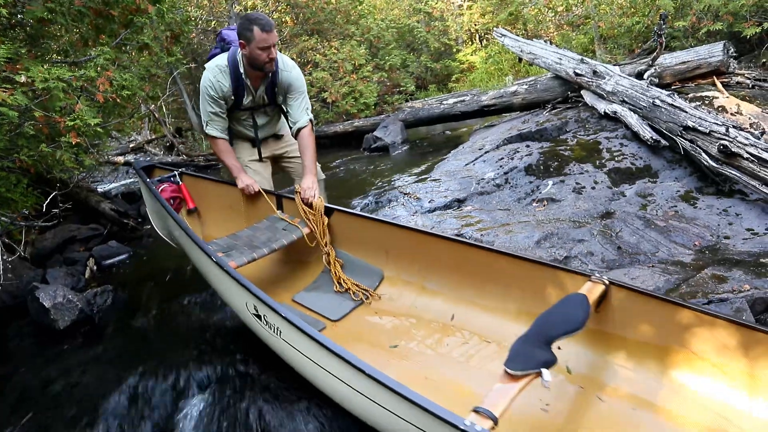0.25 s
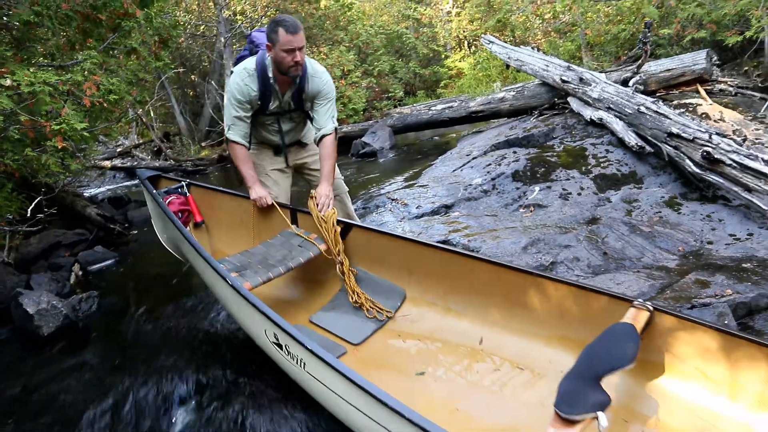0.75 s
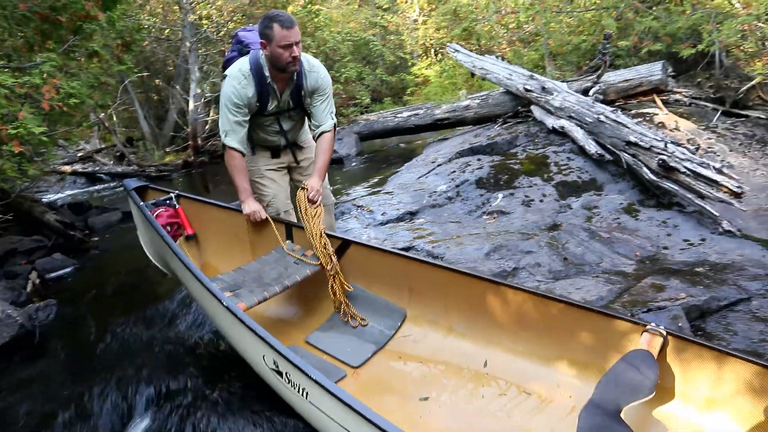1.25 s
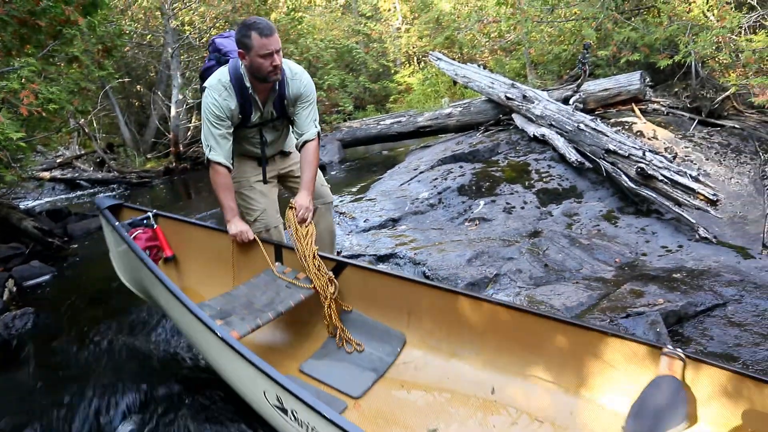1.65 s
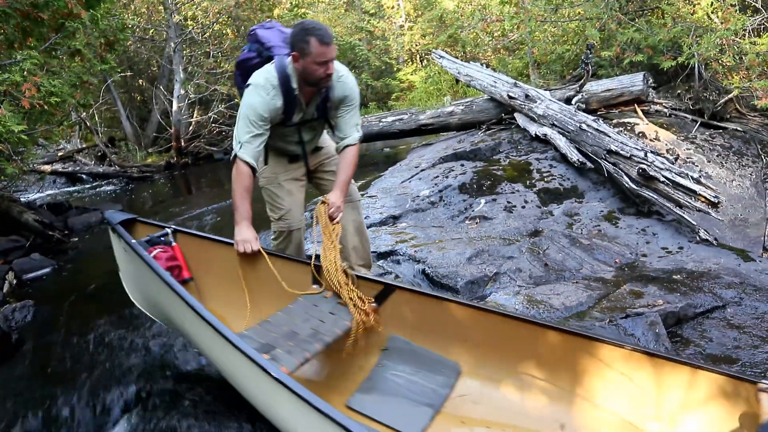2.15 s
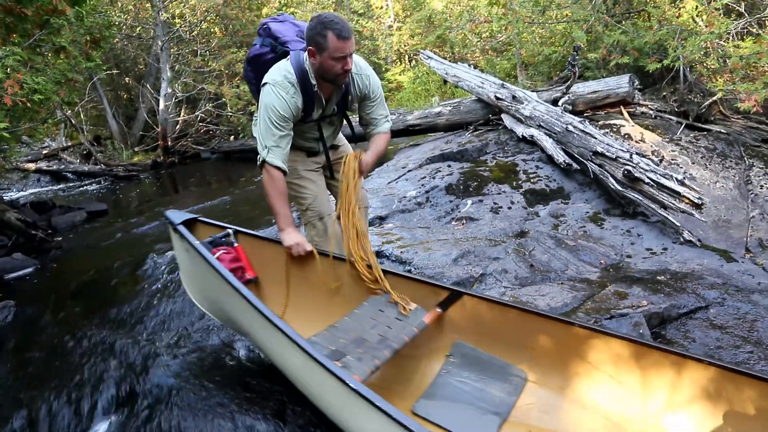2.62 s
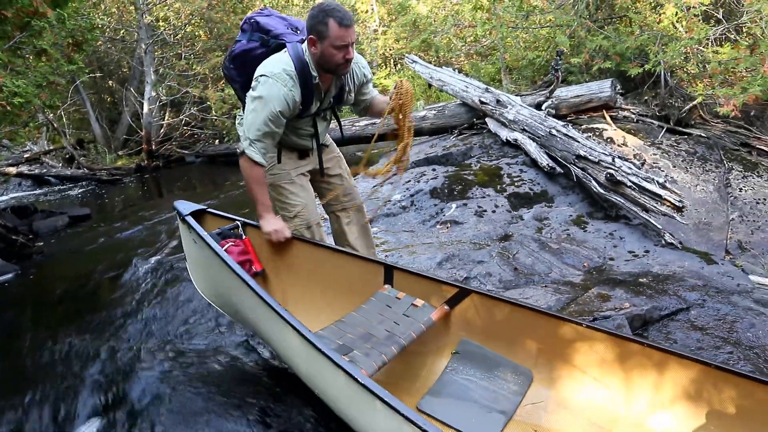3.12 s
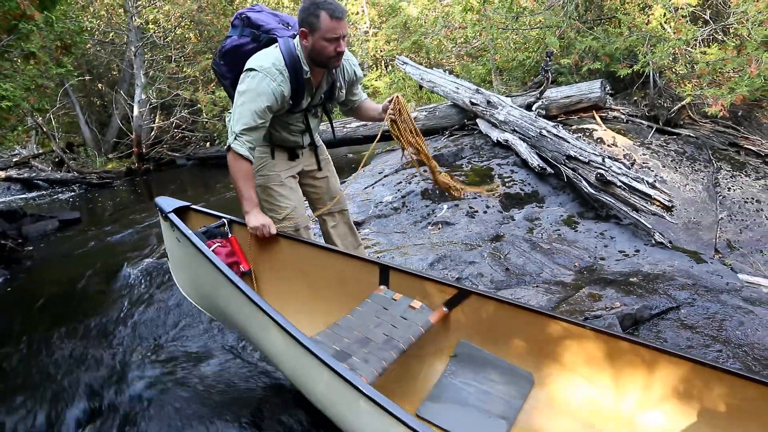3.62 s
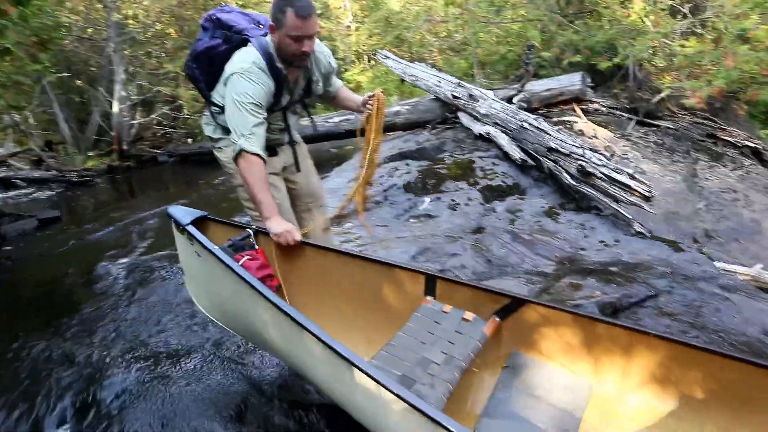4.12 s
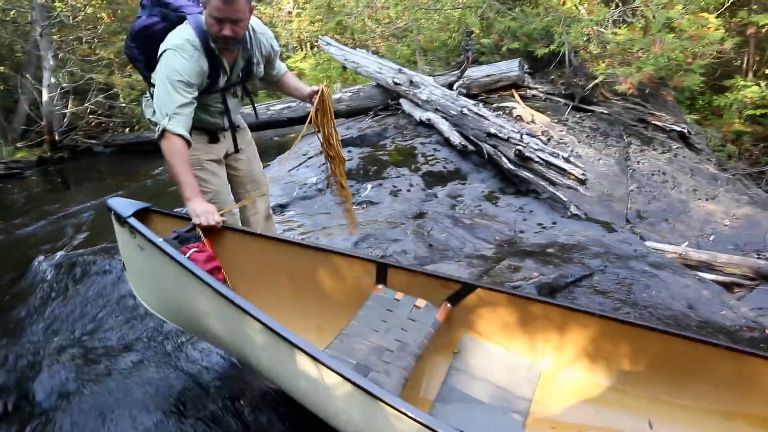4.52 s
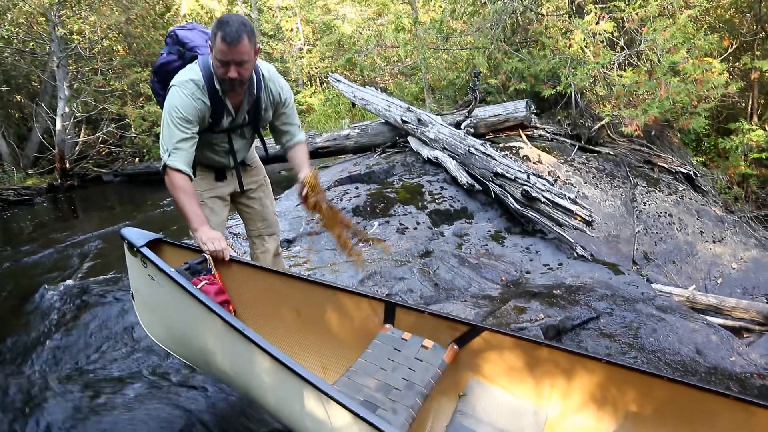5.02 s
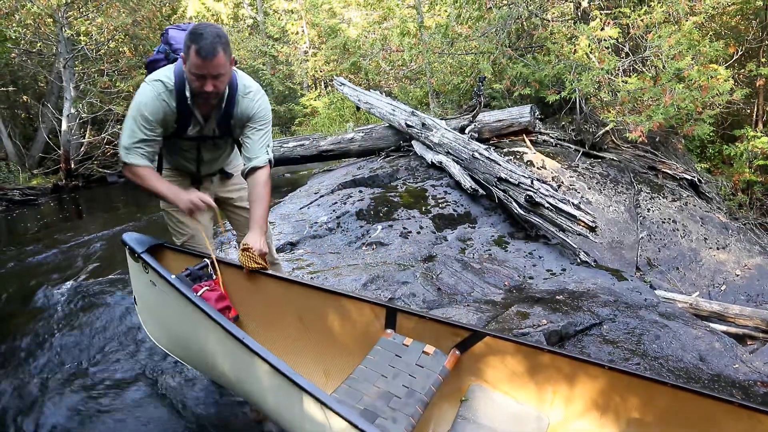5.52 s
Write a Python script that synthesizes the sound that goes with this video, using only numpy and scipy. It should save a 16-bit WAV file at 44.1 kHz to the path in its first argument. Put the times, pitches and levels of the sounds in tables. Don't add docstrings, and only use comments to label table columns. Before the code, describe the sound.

A broad waterfall rush runs from start to finish, barely swelling and sinking, with gurgling bubbles and faint bright drop ticks on top. Against it, a thin canoe hull lands on rock now and then: muffled thumps, hollow panel knocks and soft low booms of pushed water. The strongest triple bump comes near the end. It is heard close up in wide stereo, in open air, the level dipping slightly after the hardest hits.

```python
import sys
import numpy as np
from scipy import signal
from scipy.io import wavfile

SR = 44100
rng = np.random.default_rng(int(sys.argv[2]) if len(sys.argv) > 2 else 0)


def master_out(mix):
    frames = np.transpose(np.atleast_2d(mix))
    ceiling = np.clip(frames, -1, 1)
    pcm = np.round(ceiling * 32767).astype(np.int16)
    wavfile.write(sys.argv[1], SR, pcm)


def decibels_to_gain(level_db):
    exponent = np.asarray(level_db, float) / 20
    return 10 ** exponent


N = 253575


def rms_one(x):
    return x / np.sqrt(np.mean(x ** 2) + 1e-20)


def at_hz(points, hz):
    at, *columns = np.transpose(points)
    return [np.interp(np.log(hz), np.log(at), c) for c in columns]


def filtered(x, order, hz, kind):
    return signal.sosfilt(signal.butter(order, hz, kind, fs=SR, output="sos"), x)


def filtered_both_ways(x, order, hz, kind):
    return signal.sosfiltfilt(signal.butter(order, hz, kind, fs=SR, output="sos"), x)


def add(out, s, sound):
    start = round(s * SR)
    out[start:start + len(sound)] += sound[:N - start]


def drift(rate):
    r = np.exp(-80 * np.pi * rate / SR)
    noise = rng.standard_normal(N // 40 + 2002)
    slow = signal.lfilter([1], [1, -2 * r, r * r], noise)[2000:]
    return np.interp(np.arange(N) / 40, np.arange(len(slow)), rms_one(slow))


def ring(clicks, hz, t60):
    r, w = decibels_to_gain(-60 / (t60 * SR)), 2 * np.pi * hz / SR
    return signal.lfilter([0, np.sin(w)], [1, -2 * r * np.cos(w), r * r], clicks + 1e-18)


def grains(per_s, size_db, clump_db, pitches):
    sizes = decibels_to_gain(size_db * np.minimum(rng.exponential(1, N), 4)) * rng.choice([-1, 1], N)
    born = rng.random(N) < per_s * decibels_to_gain(clump_db * drift(7.0)) / SR
    dealt = rng.integers(0, len(pitches), N)
    return [(hz, sizes * born * (dealt == k)) for k, hz in enumerate(pitches)]


def swell_db(hz):
    # start_s, level_db
    flow = [(0, -21.5), (.7, -20.5), (1.2, -21), (1.95, -20.5), (2.3, -21), (3.0, -20.5), (3.3, -21.5),
            (3.6, -19.5), (4.0, -21), (4.7, -20.5), (5.0, -22), (5.3, -20), (5.75, -20.5)]
    # centre_hz, mean_db, share of flow swing [ratio]
    layers = [
        (70, -4.5, 0.15),
        (274, -1, 0.65),
        (990, 2, 1.4),
        (2320, 0.0, 0.54),
    ]
    s, flow_db = np.transpose(flow)
    mean_db, share = at_hz(layers, hz)
    return mean_db + share * np.interp(np.arange(N) / SR, s, flow_db - flow_db.mean())


def ports(common, other, hz):
    # freq_hz, level_db against common
    port_difference = [(110, -61), (210, -21), (330, -27), (500, -16.5), (760, -8.5), (1170, -10),
                       (1780, 0), (2730, 0.5), (4170, 5.5), (6500, 3.5), (8200, -7), (10100, 7),
                       (12500, 15.5), (15000, 24)]
    # freq_hz, difference in step [share], quarter cycle ahead [share]
    lean = [(150, -0.2, 0.0), (330, 0.23, .1), (550, -0.22, -0.13), (900, -0.43, .05), (1300, -0.36, -0.46),
            (1900, -0.44, -0.18), (2800, -0.31, -0.076), (4500, -0.36, -.05), (7000, 0.084, 0.0)]
    in_step, late = np.clip(at_hz(lean, hz), -.65, .65)
    quarter = np.gradient(common) / np.sin(2 * np.pi * hz / SR)
    free = np.sqrt(1 - in_step ** 2 - late ** 2)
    side = decibels_to_gain(at_hz(port_difference, hz)[0]) * (in_step * common + late * quarter + free * other)
    return np.array([common + side, common - side])


def roar(surge_db, patchy_db):
    # freq_hz, density_db per Hz
    spectrum = [(45, -10), (80, -21), (125, -4.5), (200, 0.5), (320, 2), (520, -6.5), (800, -6.5),
                (1150, -4.5), (1550, -9), (1750, -10.5), (2600, -13.5), (4200, -21), (6500, -26),
                (8200, -20.5), (15000, -74)]
    level_db, facing_db, turn_db_per_s = -17, 0.43, -0.3053
    edges_hz = 22 * 2 ** (np.arange(30) / 3)
    white = rng.standard_normal((2, 2, N + 4000))
    surge = drift(23.0)
    facing = decibels_to_gain(facing_db + turn_db_per_s * np.arange(N) / SR)
    mid, out = 0, 0
    for k, (low_hz, high_hz) in enumerate(zip(edges_hz, edges_hz[1:])):
        hz = np.sqrt(low_hz * high_hz)
        band = filtered(white[k % 2], 2, [low_hz, high_hz], "band")[:, 4000:]
        flicker_db = patchy_db * min(1, 1600 / hz) * drift(26.0)
        band = band * decibels_to_gain(at_hz(spectrum, hz)[0] + swell_db(hz) + surge_db * surge + flicker_db)
        turned = (facing - 1) * band[0] * (hz > 2000)
        mid = mid + band[0]
        out = out + ports(band[0], band[1], hz) + turned
    return decibels_to_gain(level_db) * out / np.std(mid)


def bubbles():
    level_db, ring_cycles = -22.5, 8.2
    out = 0
    for hz, clicks in grains(per_s=700, size_db=3.5, clump_db=2.5, pitches=np.geomspace(170, 1800, 16)):
        pocket = ring(clicks, hz, ring_cycles / hz) * decibels_to_gain(swell_db(hz))
        out = out + ports(pocket, np.roll(pocket, N // 3), hz)
    return decibels_to_gain(level_db) * rms_one(out)


def puffs_db():
    # centre_s, rise_db
    puffs = [(0.05, 10), (.48, 11), (1.0, 8), (1.3, 6), (1.5, 10), (1.75, 9), (2.3, 5), (2.5, 8), (3.02, 7),
             (3.55, 6.5), (3.85, 7), (4.05, 3), (4.55, 4), (4.75, 4), (5.22, 8), (5.65, 5)]
    width_s = .08
    t = np.arange(N) / SR
    return sum(rise_db * np.exp(-((t - s) / width_s) ** 2) for s, rise_db in puffs)


def mist():
    # freq_hz, level_db
    drop_colour = [(7000, -7), (8300, -4), (10500, -2), (12000, -3.5), (13500, -3), (15000, -3)]
    # start_s, tilt_db_per_octave
    spray_tilt = [(0, -6), (1.5, -7), (2.3, -4), (2.6, -3), (3.0, -5), (3.4, -3), (3.6, 1), (4.1, 4),
                  (4.3, .3), (4.6, 2), (5.1, -4), (5.4, 0), (5.75, 0)]
    level_db, puff_share, ring_cycles = -55.0, .55, 220.0
    tilt_db = np.interp(np.arange(N) / SR, *np.transpose(spray_tilt))
    ticks = 0
    for hz, clicks in grains(per_s=450, size_db=1.7, clump_db=.3, pitches=np.geomspace(7700, 14900, 34)):
        colour_db = at_hz(drop_colour, hz)[0] + tilt_db * np.log2(hz / 10000)
        ticks = ticks + ring(decibels_to_gain(colour_db) * clicks, hz, ring_cycles / hz)
    ticks = filtered(ticks, 4, 6500, "high")
    return decibels_to_gain(level_db + puff_share * puffs_db()) * rms_one(ticks)


def plops():
    # start_s, peak_db, pitch_hz
    single = [(.219, -7.5, 1570), (.334, -5.5, 1560), (.879, -12.5, 964), (.942, -19, 1040),
              (1.174, -15, 1080), (1.436, -13, 680), (1.718, -20, 1020), (2.074, -9, 834),
              (2.263, -17, 1780), (2.344, -17, 636), (2.59, -12, 1005), (2.714, -14.5, 648),
              (2.732, -12, 2000), (2.864, -9, 1660), (3.096, -23, 540), (3.226, -15, 1170),
              (3.301, -14, 1630), (3.385, -10, 1550), (3.673, -9, 1660), (3.819, -13, 655),
              (4.013, -13, 1020), (4.135, -14, 1210), (4.314, -16, 1680), (4.374, -12.5, 820),
              (4.436, -14, 840), (4.615, -10, 956), (4.668, -13, 1100), (4.77, -18, 755), (4.934, -13, 875),
              (5.046, -8.5, 1040), (5.227, -10, 1137), (5.265, -9, 1170), (5.408, -10, 1030),
              (5.499, -7, 1000), (5.609, -16, 2000)]
    # start_s, peak_db, pitch_hz
    late = [
        (3.4178, -10, 1360),
        (3.4722, -17, 1310),
        (3.5116, -13, 1350),
        (3.6743, -16, 1330),
    ]
    # start_s, peak_db, pitch_hz
    early = [
        (0.275, -17, 724),
        (0.332, -17, 789),
        (0.388, -21, 820),
    ]
    decay_cycles, rise_per_s = 5.1, 2
    out, t = np.zeros(N), np.arange(SR // 10) / SR
    for s, peak_db, hz in single + late + early:
        shape = (1 - np.exp(-t / 0.0015)) * np.exp(-t * hz / decay_cycles)
        tone = np.sin(2 * np.pi * hz * (.98 * t + rise_per_s * t ** 2))
        add(out, s, decibels_to_gain(peak_db + 3.0) * shape * tone)
    return ports(out, np.zeros(N), hz=1000)


def thuds():
    # start_s, peak_db, top_hz
    landings = [
        (0.264, -10, 480),
        (1.006, -6, 330),
        (2.169, -11, 330),
        (3.741, -5.5, 298),
        (4.213, -12, 330),
        (5.322, -3, 520),
        (5.366, -9, 500),
        (5.405, -9, 550),
    ]
    attack_s, decay_s = 0.0032, 0.064
    out, t = np.zeros(N), np.arange(SR // 6) / SR
    for s, peak_db, top_hz in landings:
        dull = filtered(rng.standard_normal(len(t)), 2, [70, top_hz], "band")
        shape = (1 - np.exp(-t / attack_s)) * np.exp(-t / decay_s)
        add(out, s, decibels_to_gain(peak_db - 13.0) * shape * rms_one(dull))
    return out


def knocks():
    # start_s, peak_db, lowest_panel_hz
    contacts = [(0.27, -10.5, 312), (1, -10.5, 278), (1.136, -7.5, 275), (1.319, -49, 296),
                (1.528, -9, 297), (1.612, -12.5, 345), (1.849, -9.5, 303), (2.168, -8.5, 239),
                (3.277, -15, 330), (3.743, -5.5, 242), (3.764, -29, 313), (4.215, -9.5, 275),
                (4.29, -10, 277), (4.659, -9, 329), (5.325, -7.5, 173), (5.358, -8, 330),
                (5.407, -6.5, 339)]
    upper_panel_hz, scatter, t60_s = 414.7, 0.16, 0.081
    out, touch = np.zeros(N), np.zeros(SR // 2)
    touch[:60] = np.hanning(60) / 30
    for s, peak_db, low_hz in contacts:
        high_hz = upper_panel_hz * (1 + scatter * rng.standard_normal())
        panel = ring(touch, low_hz, t60_s)
        panel = panel + 0.52 * ring(touch, high_hz, 2.1 * t60_s)
        panel = panel + 0.77 * ring(touch, 1.6 * high_hz, 0.47 * t60_s)
        add(out, s, decibels_to_gain(peak_db) * panel)
    return filtered(out, 2, 110, "high")


def booms():
    # start_s, peak_db, pitch_hz
    heaves = [(0.474, -25, 56.4), (0.562, -16, 330), (0.854, -40, 68.4), (1.03, -24, 77), (1.3, -26, 70),
              (1.705, -21, 47), (2.215, -27, 59.7), (2.58, -33, 55), (3.723, -19, 96), (3.923, -31, 60),
              (4.2, -21, 112), (4.92, -18.5, 154.7), (5.325, -24, 95), (5.36, -18, 148), (5.701, -17, 150)]
    heave_s, cycles = .035, 4.5
    out = np.zeros(N)
    for s, peak_db, hz in heaves:
        length_s = heave_s + cycles / hz
        t = np.arange(round(length_s * SR)) / SR
        add(out, s, decibels_to_gain(peak_db) * np.sin(np.pi * t / length_s) * np.sin(2 * np.pi * hz * t))
    return out


def snaps():
    # start_s, peak_db
    drops = [
        (.535, -36),
        (.745, -32),
        (1.49, -38),
    ]
    out, t = np.zeros(N), np.arange(SR // 40) / SR
    for s, peak_db in drops:
        add(out, s, decibels_to_gain(peak_db) * np.exp(-t / 0.007) * rng.standard_normal(len(t)))
    return filtered(out, 2, [8800, 15000], "band")


def cancel(pair):
    common_top_hz, difference_foot_hz = 6600, 133
    band_hz, strip_hz = 5300, 350
    wander_spread_db, rise_share, puff_share = 6.0, 0.45, 0.45
    fade_db_per_s = 0.12
    common = filtered_both_ways(pair[0] + pair[1], 5, common_top_hz, "low")
    tops = [filtered_both_ways(common, 4, band_hz + strip_hz * k, "high") for k in range(7)]
    together = drift(22.0)
    trend_db = puff_share * puffs_db() - 2.5 - fade_db_per_s * np.arange(N) / SR
    for k, (top, above) in enumerate(zip(tops, tops[1:] + [0])):
        wander_db = wander_spread_db * (0.11 * together + 1.84 * drift(19.0))
        wander_db = np.maximum(wander_db, 0) * rise_share + np.minimum(wander_db, 0) + trend_db
        strip_gain = decibels_to_gain(wander_db * min(1, 0.35 + 0.097 * k))
        common = common + (strip_gain - 1) * (top - above)
    difference = filtered_both_ways(pair[0] - pair[1], 1, difference_foot_hz, "high")
    return np.array([common + difference, common - difference]) / 2


def gain_control():
    # start_s, drop_db
    ducks = [
        (-.1, 3.5),
        (2.05, 1),
        (3.73, 1.6),
        (4.22, 1.5),
        (5.36, 4),
    ]
    attack_s, recovery_s = 0.027, 0.3
    s, drop_db = np.transpose(ducks)[:, :, None]
    since_s = np.maximum(np.arange(N) / SR - s, 0)
    duck_db = drop_db * (1 - np.exp(-since_s / attack_s)) * np.exp(-since_s / recovery_s)
    return decibels_to_gain(0.61 - np.sum(duck_db, axis=0))


def scene():
    fall = cancel(roar(surge_db=0.52, patchy_db=1.1) + bubbles())
    canoe = thuds() + knocks() + booms() + snaps()
    return fall + mist() + plops() + canoe


def low_pass(x):
    return signal.sosfilt(signal.butter(12, 15170, fs=SR, output="sos"), x)


def record(dry):
    wind_cut_hz = 79
    thinned = filtered(dry, 2, wind_cut_hz, "high")
    mix = 1.434 * np.tanh(gain_control() * thinned / 1.548)
    return low_pass(mix)


dry = scene()
out = record(dry)
master_out(out)
```